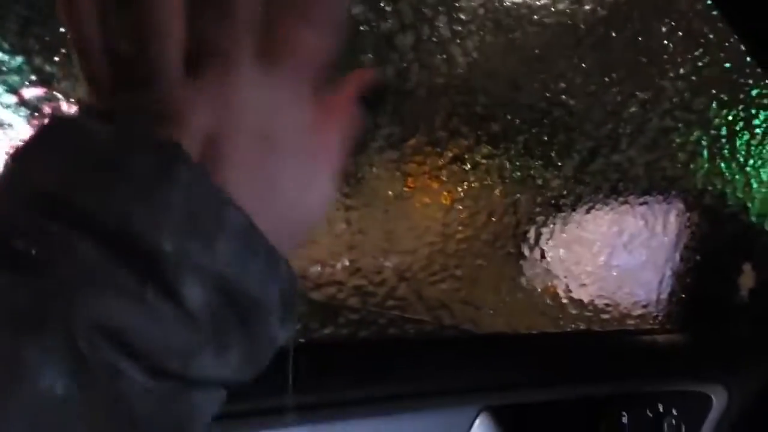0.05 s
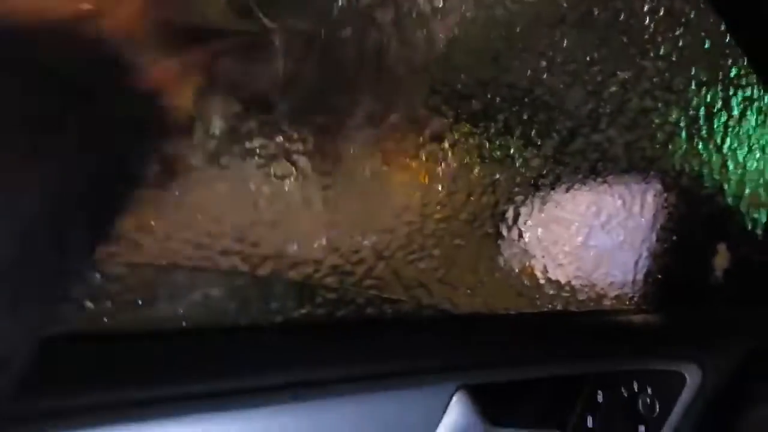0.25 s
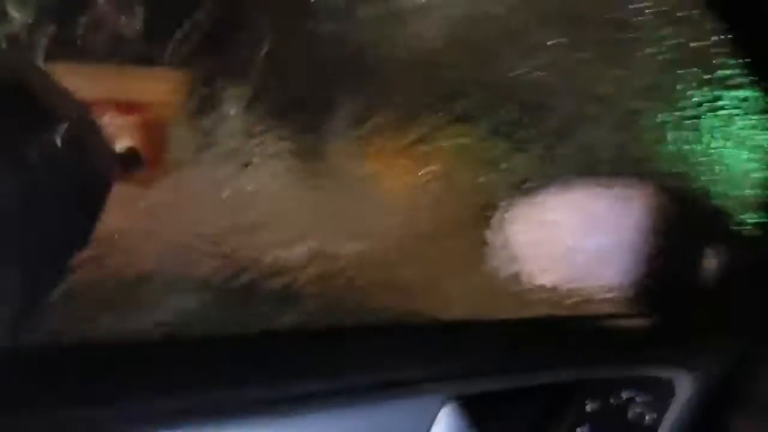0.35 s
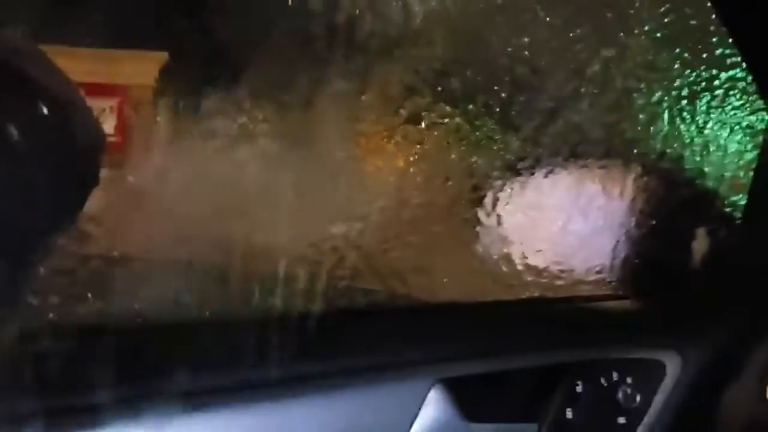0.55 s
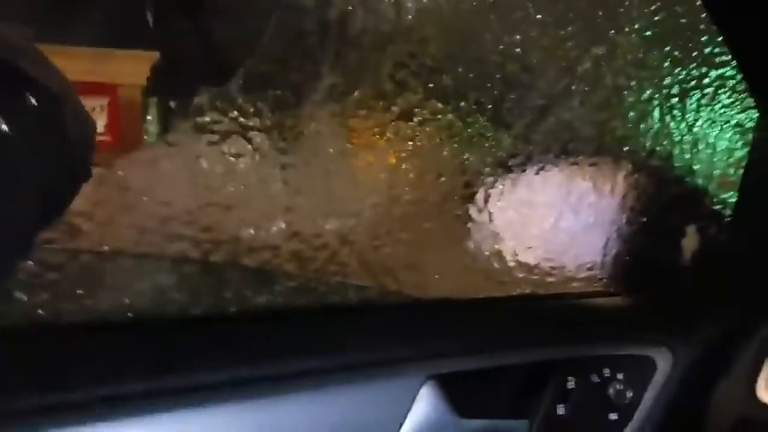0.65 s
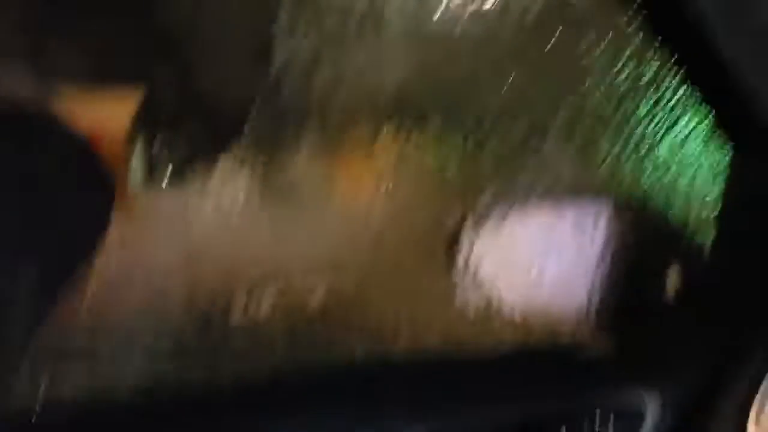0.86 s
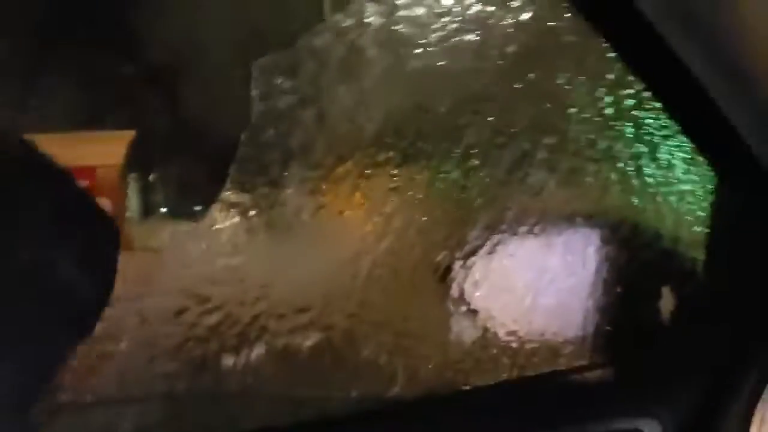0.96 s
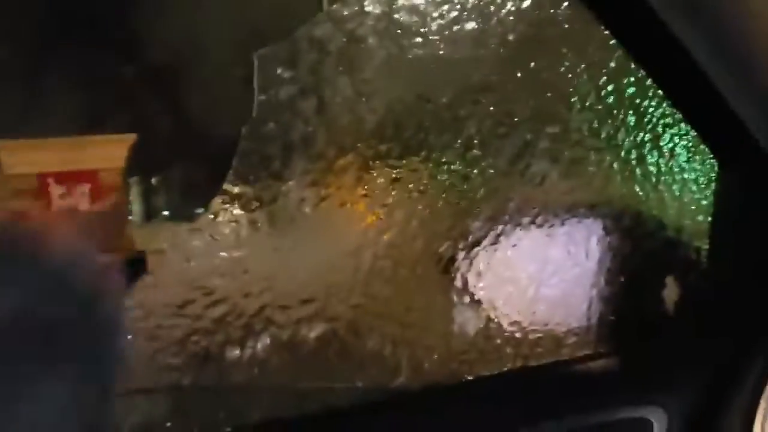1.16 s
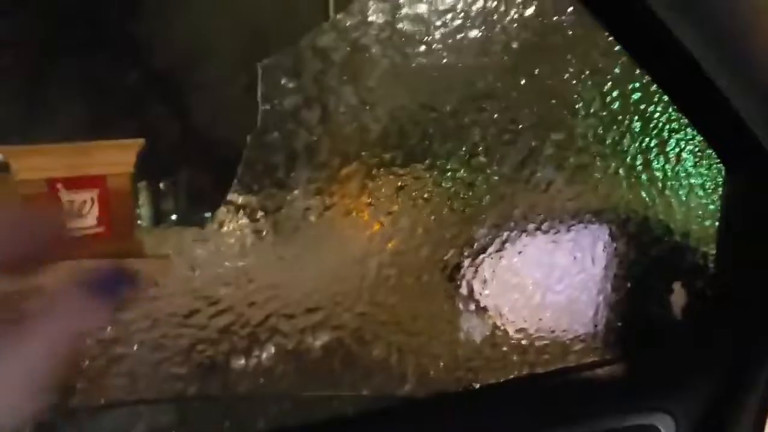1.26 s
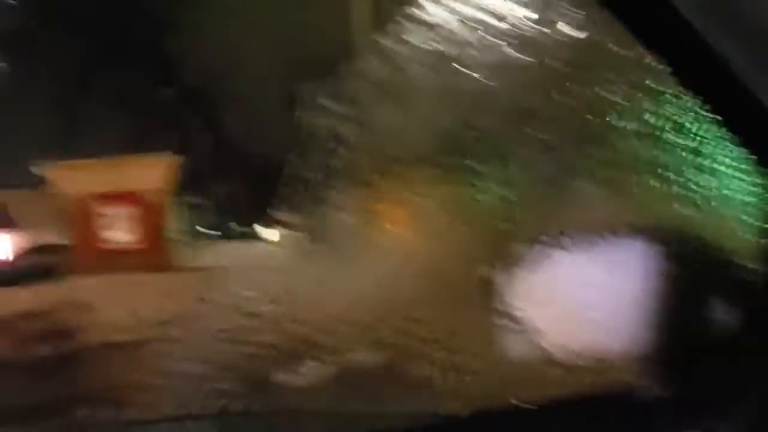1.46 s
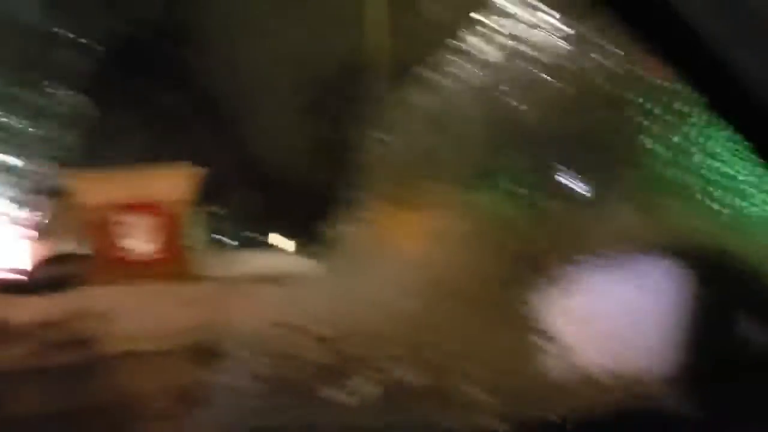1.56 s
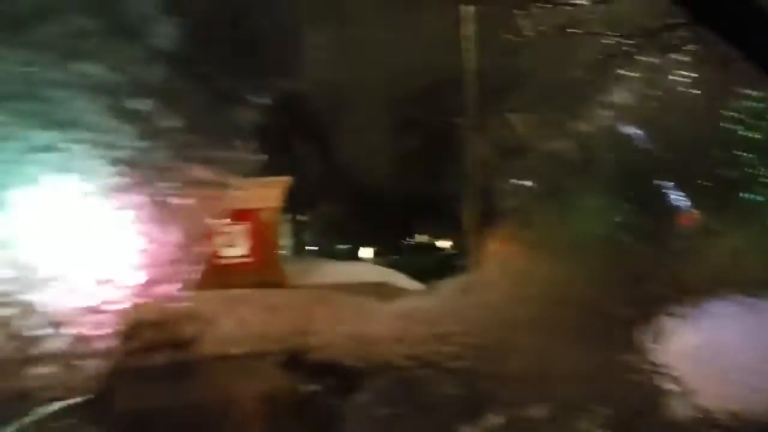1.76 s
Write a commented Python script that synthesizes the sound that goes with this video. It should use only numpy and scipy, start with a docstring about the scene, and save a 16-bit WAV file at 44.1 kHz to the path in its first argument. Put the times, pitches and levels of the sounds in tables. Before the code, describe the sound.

A sheet of ice breaks with a thump and brittle pieces slide down a car window.

```python
"""A sheet of ice cracks and gives way as a hand pushes it through the open window of a parked car.
Heard from the seat, it cracks twice, each crack a rush of tiny snaps, then thumps as the whole sheet swings.
Loose plates knock, clatter and scrape down its face while crumbs of ice tinkle.
The small padded cabin adds a short echo; a low rumble and a faint hiss lie underneath."""
import sys
import numpy as np
from scipy import signal
from scipy.fft import rfft, irfft
from scipy.io import wavfile

SR = 44100
rng = np.random.default_rng(int(sys.argv[2]) if len(sys.argv) > 2 else 0)


def unload_audio(sound):
    """Save the sound as a 16-bit wav file, at the path given as the first command line argument."""
    columns = np.transpose(np.atleast_2d(sound))
    # keep every value between -1 and 1, then stretch to whole-number steps
    steps = np.round(np.clip(columns, -1, 1) * 32767)
    wavfile.write(sys.argv[1], SR, steps.astype(np.int16))


N = 79380

# cracks and clacks of the ice (time [s], level [dB], fade time [ms], treble tilt [dB per octave],
# pitch of the freed piece [Hz], its ring compared with the snap [dB])
ICE_CRACKS = [(0.2424, -33, 5, 3.5, 5140, -5), (0.3093, -40, 7.7, -1.5, 3410, -8),
              (0.3153, -21, 1.33, -3, 5185, 12.5), (0.326, -27.5, 3.8, 0, 4840, -15),
              (.365, -46, 4, -15, 3300, -8), (0.4092, -39, 3.3, 3, 5240, -10),
              (0.4228, -36.5, 2.2, 6, 7900, -7), (0.477, -48.5, 3.6, -1, 5060, -8),
              (0.499, -31, 8.2, 1, 4300, -8), (0.5034, -25.5, 5.2, -1, 5770, -21),
              (0.5119, -27.5, 6.9, -3.5, 3930, -11), (0.5206, -27.5, 6.1, 3, 3600, -13),
              (0.5568, -41, 3.6, 3, 6100, -12), (0.6961, -47, 2.7, 2, 4920, -24),
              (0.7609, -55.5, 10, 4, 2930, -1), (0.836, -53, 6.4, -2.5, 2110, -8),
              (.8810, -35, 4.2, -0.5, 2030, -6), (0.9253, -35, 2.2, -3, 3520, -7),
              (.9560, -30.5, 4.6, -1.5, 3600, -10), (.968, -32.5, 6.4, 0.5, 7560, -14),
              (1.033, -33.5, 5.9, -0.5, 7800, 5.5), (1.042, -33.5, 2.6, -0.5, 3640, -6),
              (1.0728, -34.5, 6, -2, 7940, -2), (1.087, -32, 4.5, -1.5, 4420, 3),
              (1.105, -34.5, 7.9, 1, 4950, -6), (1.2046, -29, 2.8, 2.5, 4850, -7),
              (1.221, -42, 2.6, 5, 3580, 21), (1.282, -40, 7.4, 6.5, 5660, -23),
              (1.3186, -33, 1.8, 4, 8060, -11), (1.4442, -57, 9.6, -2, 5150, -7),
              (1.4759, -48.5, 4.8, -1.5, 4400, -8), (1.485, -61, 4.6, 6, 3670, -17),
              (1.5218, -53, 3.9, -2, 7880, -17)]
# tone of a crack before its tilt (frequency [Hz], level [dB])
CRACK_TONE = [(300, -1), (1000, -17), (1800, -5), (3000, -3), (5000, 5), (7500, 1), (9500, -4), (12500, 3),
              (14500, -6.5)]
# notes a loose plate rings at (multiple of its pitch [ratio], level [dB])
PLATE_NOTES = [(1, 5), (1.07, -8), (1.48, -15), (2.33, -3), (2.7, -15)]
# pushes as the sheet gives way, then settles (time [s], strength [dB], length [ms])
SHEET_PUSHES = [(.4998, 7, 3.1), (.5040, 2.5, 1.33), (.5085, 7, 4.5), (.533, 6, 15)]
# notes of the whole sheet in its frame (pitch [Hz], level [dB], time to fade by 60 dB [s])
SHEET_NOTES = [(34, -22, .2), (90.5, -2.5, 0.022), (121, -0.5, .07), (164, -5.5, 0.1), (232, -10, 0.076),
               (280, -3.5, 0.027), (496, -8.5, 0.09), (1025, -19, 0.1)]
# dull knocks of ice against the door
# (time [s], level [dB], pitch [Hz], crunch compared with the blow [dB], push on the sheet [dB])
DOOR_KNOCKS = [(0.2428, -40, 1010, -1, -28), (0.242, -37, 1560, -1, -24.5), (0.3156, -33, 836, 4, -39),
               (0.3662, -40, 720, -1, -42), (0.5001, -26.5, 299, -5.5, -18), (.5039, -24, 873, -4.5, 0.5),
               (0.515, -32, 293, -5, -24), (.60, -47, 595, -2, -48), (0.7, -46, 550, 2, -36),
               (0.8834, -35.5, 380, -5, -21), (.8865, -34.5, 212, -7, -25), (0.927, -34, 464, -2.5, -29),
               (.9275, -42, 905, 4, -36), (.932, -34.5, 280, -4, -27), (1.121, -35.5, 291, 7, -30),
               (1.131, -37, 287, 8, -32), (1.196, -38.5, 318, 3.5, -33), (1.246, -41, 320, 3, -37)]
# how loudly the loose ice slides (time [s], level [dB])
SLIDE_LEVELS = [(.30, -75), (.335, -43.5), (.37, -47), (.41, -68), (.50, -58.5), (.53, -44.5), (.58, -60),
                (.72, -60), (.80, -65), (.86, -82), (.945, -63), (.98, -45.5), (1.02, -52), (1.065, -53),
                (1.09, -42), (1.13, -41.5), (1.175, -48), (1.21, -42.5), (1.27, -44), (1.33, -49.5),
                (1.39, -52.5), (1.44, -60.5), (1.49, -57.5), (1.55, -70), (1.8, -73)]
# tone of the scraping (frequency [Hz], level [dB])
SCRAPE_TONE = [(250, -5), (400, -12), (700, -13.5), (1100, 1), (1500, -9.5), (2200, -5.5), (3200, -9),
               (4800, -1), (6300, -8), (7800, -4), (9500, -8.5), (14000, -3.5)]
# notes of the sliding plates (pitch [Hz], width of the note [Hz], level [dB])
SCRAPE_NOTES = [(3700, 81, -2), (3900, 90, -3), (4080, 86, -7), (4430, 100, -31), (4800, 130, -7),
                (5450, 91, 5), (5730, 90, 5), (7880, 240, 10), (12560, 140, 7), (13750, 250, -28)]
# loudness of the background (time [s], rumble level [dB], hiss level [dB])
BACKGROUND_LEVELS = [(0, -41.5, -49), (.12, -41, -51), (.28, -40.5, -50), (.46, -38, -50), (.6, -45, -54),
                     (.75, -49.5, -54.5), (.86, -45, -56), (1.1, -48.5, -61.5), (1.3, -51.5, -55.5),
                     (1.48, -53.5, -59.5), (1.6, -50.5, -56), (1.7, -50.5, -58.5), (1.8, -46.5, -54.5)]
# tone of the rumble (frequency [Hz], level [dB])
RUMBLE_TONE = [(16, -5.5), (35, -8), (55, -3), (85, -1), (118, 5), (145, -1.5), (180, 2.5), (240, -6),
               (310, -10.5), (450, -21.5), (800, -24.5), (1500, -45)]
# tone of the hiss (frequency [Hz], level [dB])
HISS_TONE = [(300, 15), (800, 4), (1500, 0), (3000, -7), (5000, -7.5), (9000, -20.5), (14000, -23.5)]

# T60 is the time a sound takes to fade by 60 dB
SNAPS_PER_S, SNAP_SPREAD_DB, SNAP_RISE_MS, PLATE_T60_S = 12000, 3, 1, 0.015
SHEET_DB, KNOCK_CRUNCH_MS, KNOCK_PUSH_MS = -25.5, 1.88, 1.3
CATCHES_PER_S, CATCH_SPREAD_DB, CATCH_MS, SCRAPE_RING_DB = 1100, 1, 1.5, -13
CLINKS_PER_S, CLINK_LOW_HZ, CLINK_HIGH_HZ = 900, 2403, 12940
CLINK_T60_S, CLINK_SPREAD_DB, CLINK_DB = 0.025, 2.5, -4
CABIN_T60_S, CABIN_GAP_S = 0.085, 0.0025
TOP_HZ = 14000


def cracks():
    """Each crack snaps brightly and rings the piece of ice that it frees."""
    out = np.zeros(N)
    for start, db, ms, tilt, hz, ring_db in ICE_CRACKS:
        snaps = fracture(ms)
        piece = sum(undb(level) * unit(ring(snaps, hz * multiple, PLATE_T60_S))
                    for multiple, level in PLATE_NOTES if hz * multiple < SR / 2)
        tone = [(freq, level + tilt * np.log2(freq / hz)) for freq, level in CRACK_TONE]
        sound = unit(colour(snaps, tone)) + undb(ring_db) * unit(piece)
        add(out, start, burst(sound, db, ms))
    return out


def fracture(ms, count=4096):
    """A crack runs through the ice: a rush of tiny snaps that swells quickly and dies."""
    t_ms = np.arange(count) * 1000 / SR
    swell = 1 - np.exp(-t_ms / SNAP_RISE_MS)
    return clicks(SNAPS_PER_S, SNAP_SPREAD_DB, count) * swell * np.exp(-t_ms / ms)


def thump():
    """The sudden release of the load sets the whole sheet swinging; knocks nudge it."""
    push = np.zeros(N)
    nudges = [(start, push_db, KNOCK_PUSH_MS) for start, *_, push_db in DOOR_KNOCKS]
    for start, db, ms in list(SHEET_PUSHES) + nudges:
        bump = np.hanning(int(ms * SR / 1000) + 3)
        add(push, start, -undb(db) * bump / bump.sum())
    return undb(SHEET_DB) * sum(undb(db) * ring(push, hz, t60) for hz, db, t60 in SHEET_NOTES)


def knocks():
    """Ice hits the door: a blow and a little crunch sound one dull note that dies at once."""
    out = np.zeros(N)
    for start, db, hz, crunch_db, _ in DOOR_KNOCKS:
        t60 = fade_time(width_hz=hz / 3)
        crunch = ring(fracture(KNOCK_CRUNCH_MS), hz, t60)
        blow = -ring(signal.unit_impulse(len(crunch)), hz, t60)
        sound = unit(blow) + undb(crunch_db) * unit(crunch)
        add(out, start, burst(sound, db, 2 * KNOCK_CRUNCH_MS))
    return out


def scrape():
    """Loose plates slide over rough ice: each catch is a tiny crunch that also rings the plates."""
    catches = clicks(CATCHES_PER_S, CATCH_SPREAD_DB, N)
    decay = np.exp(-2000 / (CATCH_MS * SR))  # share of a catch's energy left after each sample
    energy = signal.lfilter([1], [1, -decay], catches ** 2 + 1e-18)
    ticks = np.sqrt(energy) * rng.standard_normal(N)
    rings = sum(undb(db) * unit(ring(ticks, hz, fade_time(width))) for hz, width, db in SCRAPE_NOTES)
    crunch = unit(colour(ticks, SCRAPE_TONE))
    return (crunch + undb(SCRAPE_RING_DB) * unit(rings)) * curve(SLIDE_LEVELS)


def clinks(count=2048):
    """Crumbs of every size tinkle as the plates slide, each with its own brief ping."""
    out, t = np.zeros(N), np.arange(count) / SR
    fade = np.exp(-np.log(1000) * t / CLINK_T60_S)
    for when, pitch, force in rng.random((int(CLINKS_PER_S * N / SR), 3)):
        hz = CLINK_LOW_HZ * (CLINK_HIGH_HZ / CLINK_LOW_HZ) ** pitch
        db = CLINK_SPREAD_DB * min(-np.log(1 - force), 4)  # most are soft, a few louder
        add(out, when * N / SR, undb(db) * np.sin(2 * np.pi * hz * t) * fade)
    return undb(CLINK_DB) * unit(out) * curve(SLIDE_LEVELS)


def cabin(x, echo_db, count=11025):
    """Sound bounces off the nearby glass and trim, adding a short, dense echo."""
    t = np.arange(count) / SR
    fade = np.exp(-np.log(1000) * t / CABIN_T60_S)
    tail = rng.standard_normal(count) * fade * (t > CABIN_GAP_S)
    tail /= np.sqrt(np.sum(tail ** 2))
    return x + undb(echo_db) * signal.fftconvolve(x, tail)[:N]


def background():
    """A low rumble in the cabin and a faint hiss, both drifting in loudness."""
    rumble = unit(colour(rng.standard_normal(N), RUMBLE_TONE))
    hiss = unit(colour(rng.standard_normal(N), HISS_TONE))
    return rumble * curve(BACKGROUND_LEVELS, column=1) + hiss * curve(BACKGROUND_LEVELS, column=2)


def undb(db):
    """Turn decibels into a number to multiply by."""
    return 10 ** (np.asarray(db) / 20)


def unit(x):
    """Scale a sound to an average (rms) level of 1."""
    return x / np.sqrt(np.mean(x ** 2) + 1e-20)


def burst(x, db, ms):
    """Give a short sound the energy of a level of db held for ms."""
    return x * undb(db) * np.sqrt(ms * SR / 1000 / (np.sum(x ** 2) + 1e-20))


def add(out, start, x):
    """Mix x into out at start seconds."""
    i = int(start * SR)
    out[i:i + len(x)] += x[:N - i]


def curve(table, column=1):
    """Join a table's dB points into a volume that changes over time."""
    rows = np.array(table)
    return undb(np.interp(np.arange(N) / SR, rows[:, 0], rows[:, column]))


def colour(x, points, size=8192):
    """Shape a sound's bass and treble to follow (Hz, dB) points."""
    hz, db = np.array(points).T
    freqs = np.maximum(np.arange(size // 2 + 1) * SR / size, 1)
    bass_cut = np.minimum(freqs / hz[0], 1)
    gain = undb(np.interp(np.log(freqs), np.log(hz), db)) * bass_cut
    # fold the filter forward in time, so nothing sounds before the click that causes it
    folded = irfft(np.log(gain))
    folded[1:size // 2] *= 2
    folded[size // 2 + 1:] = 0
    response = irfft(np.exp(rfft(folded)))
    return signal.fftconvolve(x, response)[:len(x)]


def ring(x, hz, t60):
    """Let x set off one fading note."""
    step = np.exp((2j * np.pi * hz - np.log(1000) / t60) / SR)
    return signal.lfilter([1], [1, -step], x).real


def fade_time(width_hz):
    """Seconds for a note to fade by 60 dB: the wider its band, the sooner it dies."""
    return np.log(1000) / (np.pi * width_hz)


def clicks(per_s, spread_db, count):
    """Random clicks, up or down, a few larger than the rest."""
    size = undb(spread_db * np.minimum(rng.exponential(size=count), 4))
    return (rng.random(count) < per_s / SR) * size * np.sign(rng.standard_normal(count))


def scene():
    """All the ice over the background; everything but the thump and background gets the echo."""
    low = cabin(knocks(), echo_db=-6) + thump() + background()
    bright = cabin(cracks() + scrape() + clinks(), echo_db=-7.5)
    return (low + bright)[None]


def record(dry):
    """Cut the treble above TOP_HZ."""
    return signal.sosfilt(signal.ellip(8, .2, 70, TOP_HZ, fs=SR, output="sos"), dry)


dry = scene()
out = record(dry)
unload_audio(out)
```